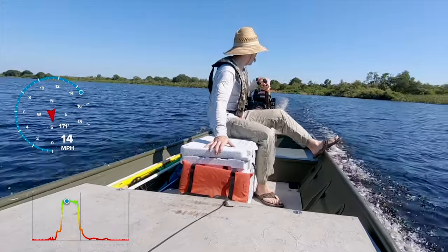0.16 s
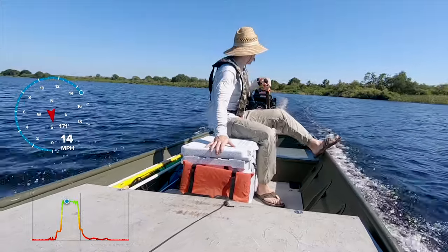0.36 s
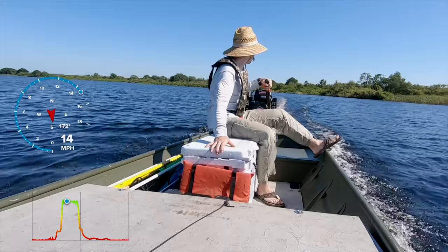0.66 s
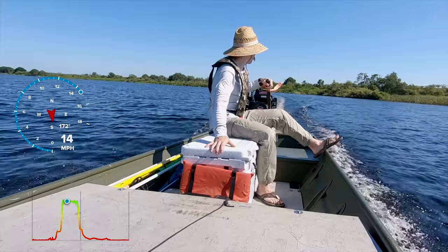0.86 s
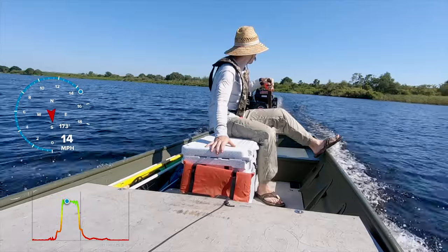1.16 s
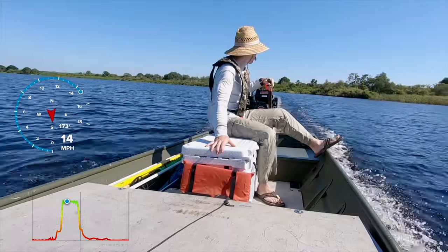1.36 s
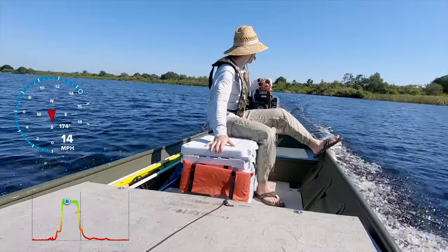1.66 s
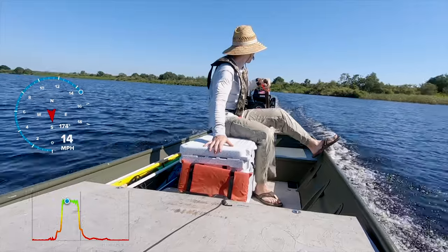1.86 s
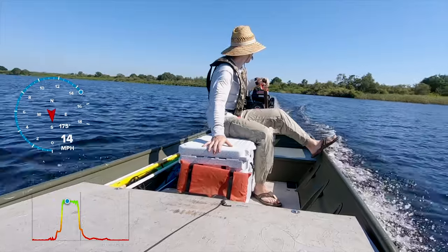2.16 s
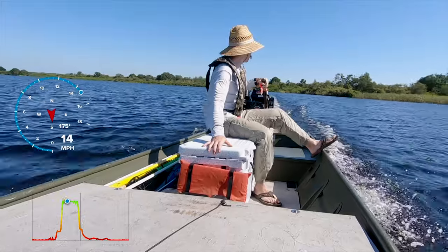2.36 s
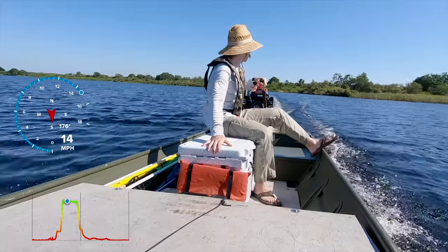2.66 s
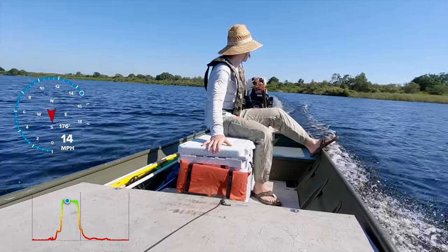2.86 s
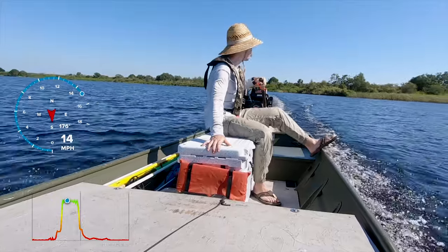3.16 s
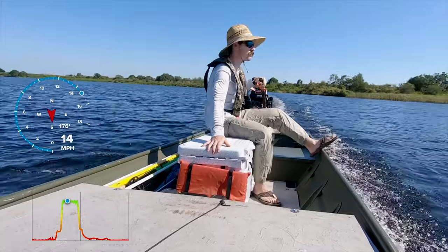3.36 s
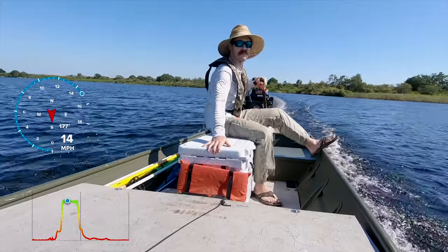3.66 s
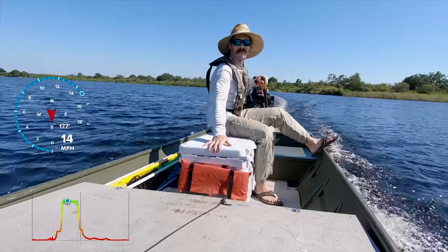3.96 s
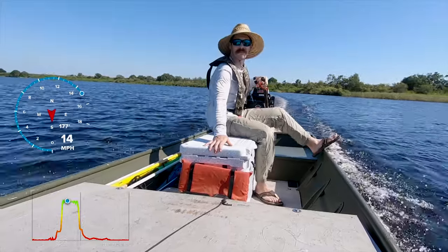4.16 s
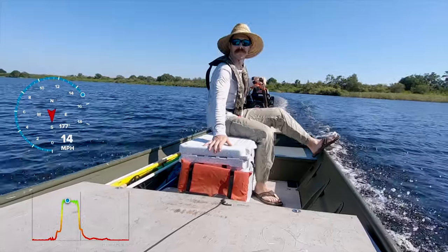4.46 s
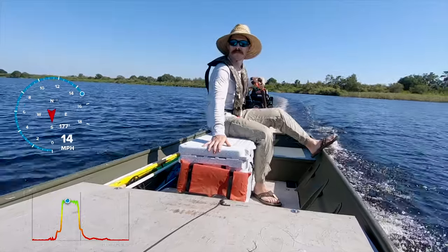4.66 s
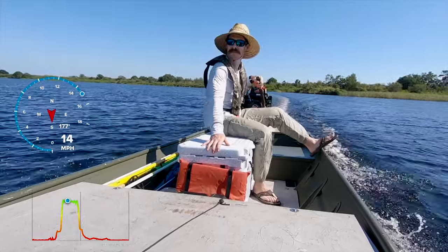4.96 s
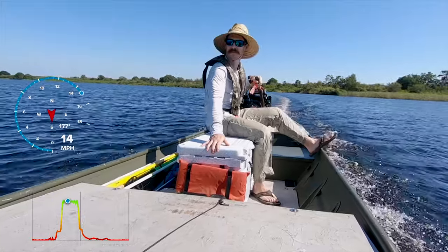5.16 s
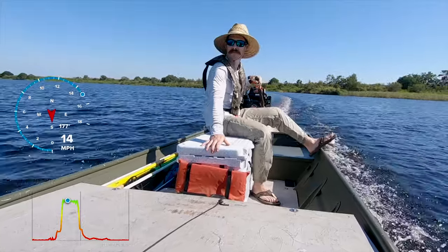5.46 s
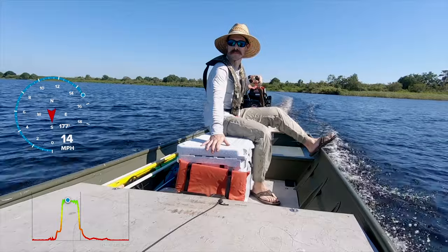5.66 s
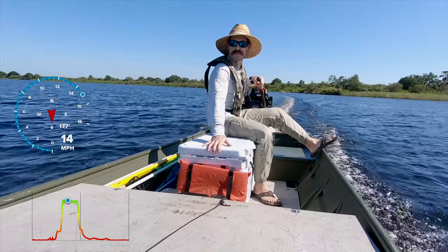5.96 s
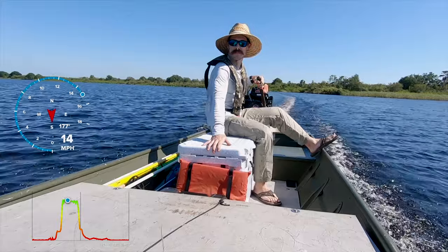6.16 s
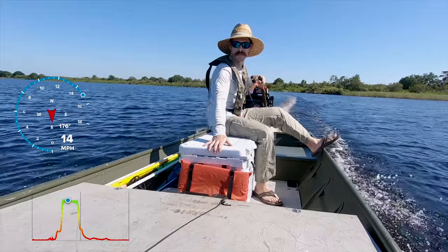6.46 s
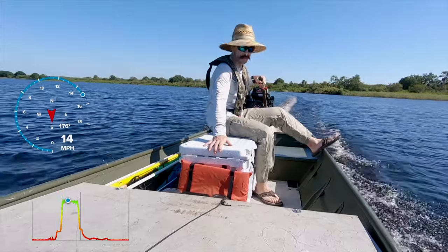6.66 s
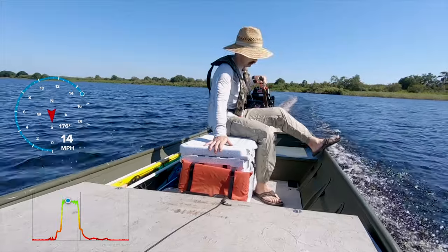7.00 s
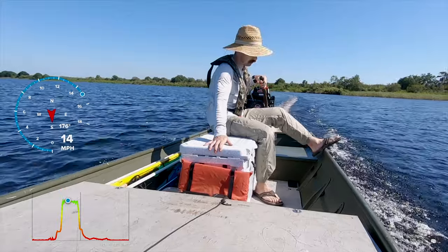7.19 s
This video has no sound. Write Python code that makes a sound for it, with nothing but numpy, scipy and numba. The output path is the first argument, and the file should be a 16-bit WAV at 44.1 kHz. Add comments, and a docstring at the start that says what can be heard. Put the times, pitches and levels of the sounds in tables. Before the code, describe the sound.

Continuous full-speed run of a small longtail boat motor heard from the bow. A rough low hum, about thirty firings a second, carries rapid valve and piston ticking, a faint fan whine and a thin metal ring. Water wash and fine spray hiss constantly, with small random plinks and three louder ones late. Gusty wind flutters close to the microphone; the bass is held down and highs are dulled by its housing.

```python
"""A small single-cylinder four-stroke drives a longtail boat at full speed, heard by a microphone at the bow.
Throughout, exhaust and hull hum on multiples of the firing rate, valves and piston clatter each cycle, the fan whines,
gas and spray hiss, headwind rumbles and a thin cover rings faintly, a little louder at the start and around 4.4 s.
Between 1.2 and 1.8 s the engine speeds up; from 3 to 6.4 s hum and wind flutter surge; near 5 s three big drops hit
the hull. The microphone holds the bass down and its housing muffles the top."""
import sys
import numpy as np
from scipy import signal
from scipy.fft import rfft, irfft, next_fast_len
from scipy.io import wavfile
from scipy.ndimage import uniform_filter1d
from numba import njit

SR = 44100
rng = np.random.default_rng(int(sys.argv[2]) if len(sys.argv) > 2 else 0)


def boost(x):
    """Linear amplitude factor 10**(x/20) for a level x in decibels (scalar or array-like)."""
    u = np.asarray(x, float) / 20
    return 10 ** u


def output_pcm(signal):
    """Save a mono or channel-first signal as 16-bit PCM at the path in sys.argv[1].

    Samples are clipped to [-1, 1] before scaling.
    """
    pcm = np.clip(np.atleast_2d(signal).T, -1, 1) * 32767
    wavfile.write(sys.argv[1], SR, np.round(pcm).astype(np.int16))


N = 323253

# slow fades of the hiss: (time [s], spray level [dB], gas level [dB])
HISS = [(0, -28, -31.5), (.8, -27, -32.5), (3.4, -26.5, -31.5), (4.2, -28, -32.5), (7.33, -29, -35)]


def level(x, db):
    """Set the rms level."""
    return x * boost(db) / np.sqrt(np.mean(x ** 2))


def colour(x, points, size=4096):
    """Filter by (frequency [Hz], gain [dB]) points joined on a log axis; mirrored ends keep the edges free of steps."""
    hz, db = np.transpose(points)
    total = next_fast_len(N + 2 * size)
    log_hz = np.log(np.arange(1, total // 2 + 2) * SR / total)
    gain = boost(np.interp(log_hz, np.log(hz), db))
    spectrum = rfft(np.pad(x, size, "reflect"), total)
    return irfft(spectrum * gain, total)[size:size + N]


def walk(rate_hz):
    """Random levels held 1 / rate s and slewed twice; spread near 1."""
    hold = int(SR / rate_hz)
    steps = np.repeat(rng.standard_normal(N // hold + 1), hold)
    return 1.1 * uniform_filter1d(uniform_filter1d(steps, hold), hold)[:N]


def curve(table):
    """Columns of a table, sample by sample."""
    s, *columns = np.transpose(table)
    return [np.interp(np.arange(N) / SR, s, c) for c in columns]


def swells(table):
    """Sum of smooth cosine-squared swells, dB."""
    t = np.arange(N) / SR
    return sum(db * np.cos(np.pi * np.clip((t - crest_s) / (2 * half_s), -.5, .5)) ** 2
               for crest_s, half_s, db in table)


def ring(x, modes, drift_db=0.67):
    """Sum of two-pole resonances of alternating sign; each swells slowly as the hull rides the chop."""
    out = np.zeros(N)
    for k, (hz, width_hz, db) in enumerate(modes):
        gain = (-1) ** k * boost(db + drift_db * walk(2.46))
        out += gain * signal.lfilter(*signal.iirpeak(hz, hz / width_hz, SR), x)
    return out


def engine_cycle():
    """Cycles of two crank turns run so far, the integral of crank speed."""
    # crank speed: (time [s], speed [turns/min])
    speed = [(0, 3542), (1.2, 3545), (1.8, 3604), (5.4, 3603), (5.8, 3588), (6.6, 3587), (6.9, 3579),
             (7.33, 3589)]
    rpm, = curve(speed)
    return np.cumsum(rpm) / (120 * SR)


def hum(cycle, surge_db, waver_db=1.13, waver_rad=0.16, spread_rad=-.57, odd_rad=-0.64):
    """Clean firing-rate multiples; muffler and hull spread them in time, firing lags the crank, each wavers alone."""
    # exhaust and hull: (multiple of the firing rate, relative level [dB])
    harmonics = [(1, -19.5), (2, 0), (3, -3), (4, 2), (5, 0), (6, 2), (7, -13.5), (8, -5.5), (9, -12),
                 (10, -6.5), (11, -17.5), (12, -9), (13, -14), (14, -15.5), (15, -18.5), (16, -13.5),
                 (17, -29.5), (18, -32.5), (19, -31.5), (20, -30)]
    # part of a surge taken by each region of the hum: (frequency [Hz], share)
    surge_share = [(120, -0.22), (180, 0.97), (240, 1.07), (340, -0.23), (480, 1.2)]
    hum_db = -23
    share_hz, share = np.transpose(surge_share)
    firing_hz = cycle[-1] * SR / N  # mean
    out = np.zeros(N)
    for k, db in harmonics:
        surge = surge_db * np.interp(k * firing_hz, share_hz, share)
        gain = boost(hum_db + db + surge + waver_db * walk(5) + 0.6 * walk(1.6))
        lag_rad = spread_rad * k ** 2 + odd_rad * (k % 2) + waver_rad * walk(6)
        out += np.sqrt(2) * gain * np.sin(2 * np.pi * k * cycle + lag_rad)
    return out


def fan(cycle, blades=24, fan_db=-43):
    """Blade tone of the flywheel cooling fan, two turns to a cycle."""
    gain = np.sqrt(2) * boost(fan_db + 2.1 * walk(5.2))
    return gain * np.sin(2 * np.pi * 2 * blades * cycle + .5 * walk(10))


def rattle(cycle, scatter_db=2.0, jitter_ms=0.039, steady_db=-8):
    """Valve and piston blows: each a sharp, nearly punctual tick and a decaying noise burst, over steady noise."""
    # blows in a cycle: (place in the cycle [0-1], level [dB], decay [ms], tick level against the rattle [dB])
    blow_table = [(.02, -6, 3.8, 17.5), (.3, -13.5, 4, 13), (.6, -12.5, 2.1, 16.5), (.86, -11, 3.3, 19)]
    gate, ticks = boost(steady_db), np.zeros(N)
    cycle_s = (N / SR) / cycle[-1]  # mean
    chance = rng.standard_normal((int(cycle[-1]) + 2, len(blow_table), 2))
    for k, (place, db, decay_ms, tick_db) in enumerate(blow_table):
        since = cycle + 1 - place
        turn = since.astype(int)
        size = boost(db + scatter_db * chance[turn, k, 0])
        gate = gate + size * np.exp(-(since % 1) * cycle_s * 1000 / decay_ms)
        start = np.flatnonzero(np.diff(turn)) + 1
        late = jitter_ms * SR / 1000 * chance[turn[start], k, 1]  # samples
        ticks[np.clip(start + late, 0, N - 1).astype(int)] = size[start] * boost(tick_db)
    return gate * rng.standard_normal(N) + ticks


def casing(blows, clatter_db=-28.5):
    """Engine casing and hull plates resonate under the blows."""
    # resonances: (frequency [Hz], width [Hz], relative gain [dB])
    plate_modes = [(622, 144, -7.5), (960, 122, -0.5), (1081, 79, 0.5), (1247, 75, -1), (1388, 96, -9.5),
                   (1680, 91, -3.5), (2020, 128, -3), (2255, 170, -1), (2373, 69, 1), (2568, 66, -6),
                   (3560, 130, -7), (3840, 160, -11), (4194, 240, -10.5), (4514, 120, -11)]
    return level(ring(blows, plate_modes), clatter_db)


def cover(blows, cover_db=-41.5):
    """Thin metal cover driven by the blows, ringing all along, a little louder in two slow swells."""
    # resonances: (frequency [Hz], width [Hz], relative gain [dB])
    cover_modes = [(3021, 50, -3), (3050, 50, -1.5), (3129, 50, -2.5)]
    # louder spells: (crest time [s], half length [s], rise [dB])
    cover_swells = [(.1, .4, 1), (4.4, 2.4, 2.5)]
    return boost(swells(cover_swells)) * level(ring(blows, cover_modes, drift_db=0.8), cover_db)


def gas(cycle, scatter_db=3.0, steady_db=-5):
    """Hiss of exhaust and intake: a long puff and a short gulp each cycle over a steady flow."""
    # gas flow in a cycle: (place in the cycle [0-1], level [dB], decay [cycles])
    puffs = [(0, -2, 0.28), (.58, -5.5, .08)]
    _, gas_db = curve(HISS)
    chance = boost(scatter_db * rng.standard_normal((int(cycle[-1]) + 2, len(puffs))))
    flow = boost(steady_db)
    for k, (place, db, decay) in enumerate(puffs):
        since = cycle + 1 - place
        flow = flow + boost(db) * chance[since.astype(int), k] * np.exp(-(since % 1) / decay)
    flow = uniform_filter1d(flow, size=60)
    hiss = colour(flow * rng.standard_normal(N), [(2500, -31), (5500, -0.5), (16000, 1.0)])
    return boost(gas_db) * level(hiss, 0)


def wind(surge_db, buffet_db=0.75, flutter_db=-16, flutter_share=0.35):
    """Turbulence on the microphone port: a deep gusty rumble and a lighter flutter that takes a share of the surges."""
    # headwind: (time [s], rumble gain [dB])
    gusts = [(0, -19.5), (.7, -16.5), (1.4, -15), (1.8, -17.5), (2.1, -16.5), (2.4, -20), (3.4, -17),
             (4.0, -12), (4.3, -15.5), (4.9, -13.5), (5.4, -18), (6.5, -13.5), (7.33, -18.5)]
    # turbulence spectrum: (frequency [Hz], gain [dB])
    wind_colour = [(5, -24), (20, -1), (53, 0), (168, -3), (221, -6.5), (300, -13.5), (430, -16),
                   (500, -18), (800, -30), (1200, -52)]
    gust_db, = curve(gusts)
    air = level(colour(rng.standard_normal(N) * boost(buffet_db * walk(18)), wind_colour), 0)
    rumble = signal.lfilter(*signal.butter(2, 120, fs=SR), air)
    return boost(gust_db) * rumble + boost(flutter_db + flutter_share * surge_db) * (air - rumble)


def spray(surge_db=1.0, grain_db=2.0, split_hz=1600):
    """Bow water breaking: dense droplets of uneven size; the deep wash and the fine spray surge apart."""
    # spectrum: (frequency [Hz], relative density [dB per Hz])
    spray_colour = [(300, -11), (600, 1.5), (830, -12), (1200, 4.5), (2300, -1.5), (2900, -6), (4400, -7.5),
                    (7000, -14.5), (15000, -14)]
    spray_db, _ = curve(HISS)
    wash, fine = (colour(rng.standard_normal(N) * boost(grain_db * walk(300) + surge_db * walk(14)), spray_colour)
                  for _ in range(2))
    split = signal.butter(2, split_hz, fs=SR)
    water = signal.filtfilt(*split, wash - fine) + fine  # wash below the split, fine above
    return boost(spray_db) * level(water, 0)


def drops(spread_db=5, decay_ms=1.4, small_per_s=14, small_db=-27.5):
    """Drops striking the hull: short damped plinks of rising pitch, the loudest by the table, smaller ones at random."""
    # big drops: (time [s], initial amplitude [dB], starting frequency [Hz])
    big = [(4.9442, -9, 1150), (5.1194, -16, 1270), (5.2495, -11.5, 1690)]
    out, t = np.zeros(N + SR // 20), np.arange(SR // 20) / SR
    chance = rng.random((200, 3))
    times = np.cumsum(-np.log(1 - chance[:, 0])) / small_per_s
    small = [(s, small_db + spread_db * c[1], 900 * 3 ** c[2]) for s, c in zip(times, chance) if s < N / SR]
    for s, db, hz in list(big) + small:
        i = int(s * SR)
        plink = np.exp(-t * 1000 / decay_ms) * np.sin(2 * np.pi * hz * t * (1 + 20 * t))
        out[i:i + len(t)] += boost(db) * plink
    return out[:N]


def scene():
    """Engine, water and wind at one microphone."""
    # surges of hum and flutter: (crest time [s], half length [s], rise [dB])
    surges = [(3.61, 0.56, 6.5), (4.408, 0.15, 3), (5.1, 0.18, 0), (5.504, 0.34, 1), (6.146, 0.24, 4.5)]
    cycle, surge_db = engine_cycle(), swells(surges)
    blows = rattle(cycle)
    engine = hum(cycle, surge_db) + fan(cycle) + casing(blows) + cover(blows) + gas(cycle)
    return (engine + wind(surge_db) + spray() + drops())[None]


@njit
def squeeze(x, top, power, attack, release):
    """Gain control: turns down whatever rises over the top, following the mean magnitude."""
    y, e = np.empty(len(x)), np.mean(np.abs(x))
    for i in range(len(x)):
        e += (abs(x[i]) - e) * (attack if abs(x[i]) > e else release)
        y[i] = x[i] * min(1., top / e) ** power
    return y


def top_cut(x):
    """Nothing passes above the cut-off."""
    return signal.sosfilt(signal.butter(12, 15140, fs=SR, output="sos"), x)


def record(dry):
    """The housing muffles the top; gain control acts on the bass alone; the first and last 3 ms fade."""
    # microphone behind its housing: (frequency [Hz], gain [dB])
    housing = [(20, -4.5), (4550, 0), (4700, -3.5), (5500, -16), (6600, -18), (7000, -15), (8100, -14.5),
               (8500, -20.5), (10000, -21.5), (10900, -34), (12400, -28), (15000, -39.5)]
    attack_s, release_s, fade_s = 0.0096, 0.031, .003
    x = colour(dry[0], housing)
    bass = colour(x, [(20, 0), (400, 0), (800, -40), (20000, -120)])
    held = squeeze(bass, boost(-18.5), 0.53, 1 / (attack_s * SR), 1 / (release_s * SR))
    to_edge = np.minimum(np.arange(N), np.arange(N)[::-1])  # samples
    fade = np.sin(np.pi / 2 * np.clip(to_edge / (fade_s * SR), 0, 1)) ** 2
    mix = fade * (x - bass + boost(2.5) * held)
    return top_cut(mix[None])


dry = scene()
out = record(dry)
output_pcm(out)
```